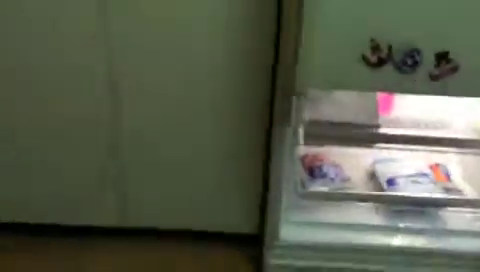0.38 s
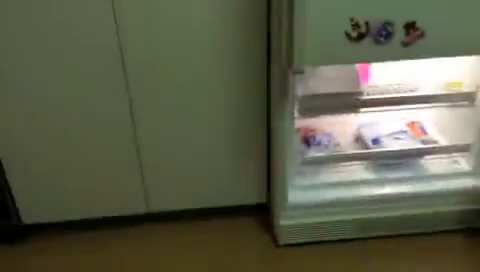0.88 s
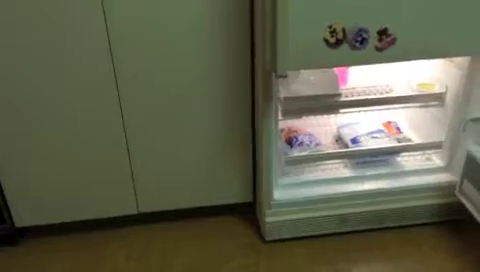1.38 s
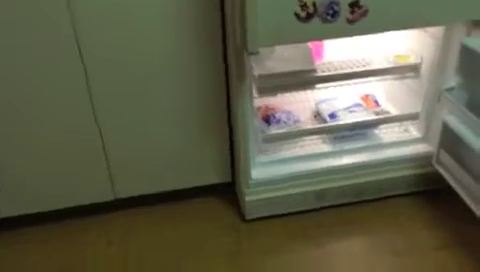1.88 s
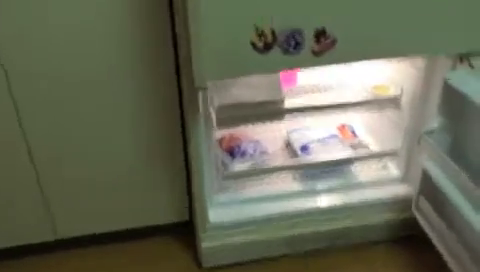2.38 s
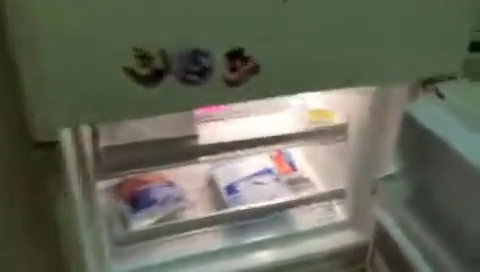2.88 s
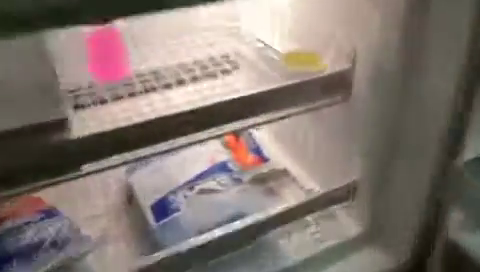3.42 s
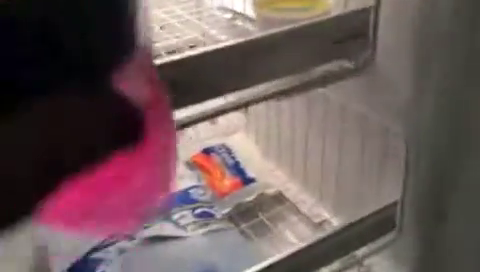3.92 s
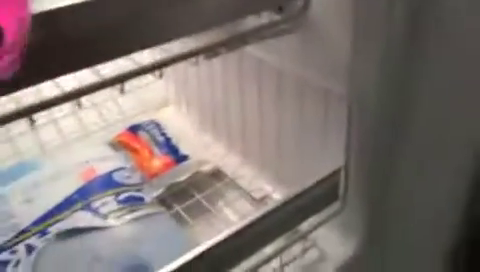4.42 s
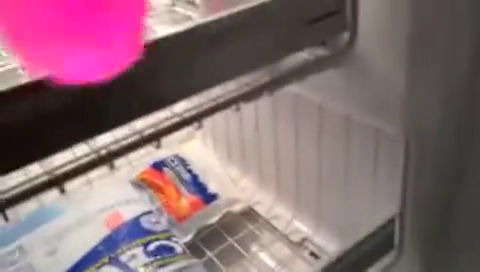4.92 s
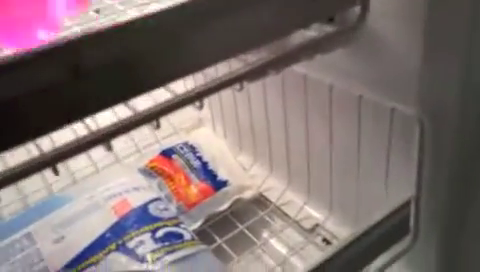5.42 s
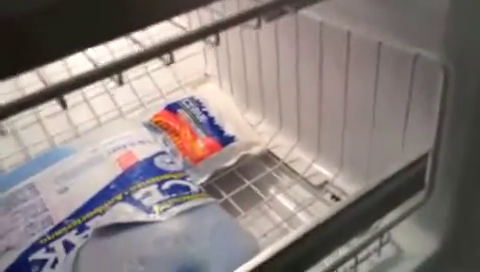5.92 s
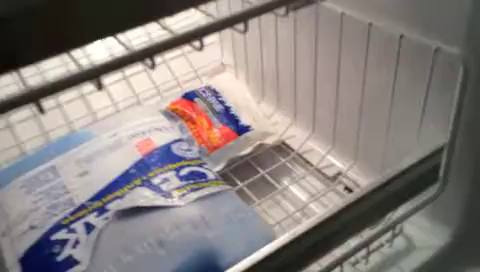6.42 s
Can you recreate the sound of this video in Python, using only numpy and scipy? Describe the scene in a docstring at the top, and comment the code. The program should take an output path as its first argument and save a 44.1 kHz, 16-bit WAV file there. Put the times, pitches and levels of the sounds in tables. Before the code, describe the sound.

Quiet footsteps and rustling, then light plastic bottles scrape, squeak and clack sharply onto wire baskets with dull thumps in a small kitchen.

```python
"""Bottles into a freezer

Someone steps up to an open freezer in a small kitchen and sets light plastic bottles down in its wire baskets.
Feet and the cabinet thump as damped low swings; bottles clack and rub as showers of tiny contacts that ring
their walls, drag over the wires through a gliding resonance and squeak by stick-slip.
Clothes and hands rustle as soft grains; handling rumble, a faint whistle and hiss are coloured noise."""
import sys
import numpy as np
from scipy import signal
from scipy.io import wavfile

SR = 44100
rng = np.random.default_rng(int(sys.argv[2]) if len(sys.argv) > 2 else 0)


def volts(x):
    """Linear amplitude factor 10**(x/20) for a level x in dB, scalar or array-like."""
    e = np.asarray(x, float) / 20
    return 10 ** e


def pcm_store(signal):
    """Save signal as 16-bit PCM."""
    levels = np.round(np.clip(np.atleast_2d(signal), -1, 1) * 32767)
    wavfile.write(sys.argv[1], SR, levels.astype(np.int16).T)


N = 288969
BANDS = 30 * 2 ** np.arange(0, 9.1, 1 / 3)   # edges of third-octave bands, Hz
UPPER_BANDS = list(zip(BANDS[9:], BANDS[10:]))   # those from 240 Hz up


def rms_one(x):
    """Normalisation: scale to rms 1."""
    return x / np.sqrt(np.mean(x ** 2) + 1e-20)


def in_time(rows):
    """Linear interpolation: columns of a curve, one value a sample."""
    s, *columns = np.transpose(rows)
    return [np.interp(np.arange(N) / SR, s, c) for c in columns]


def faded(rows, fade_s):
    """Onset and release: pitch and level of a sound that fades to -120 dB before and after its rows."""
    before = (rows[0][0] - fade_s, rows[0][1], -120)
    after = (rows[-1][0] + fade_s, rows[-1][1], -120)
    return in_time([before, *rows, after])


def at_hz(hz, points_hz, values):
    """Spectral envelope: values given at a few frequencies, read on a log axis."""
    share = [np.interp(np.log(hz), np.log(points_hz), row) for row in np.eye(len(points_hz))]
    return sum(w * v for w, v in zip(share, values))


def drift(rate_hz):
    """Slow random modulation: noise through a double pole, rms 1, computed at every 40th sample."""
    r = np.exp(-80 * np.pi * rate_hz / SR)
    white = rng.standard_normal(N // 40 + 2002)
    slow = signal.lfilter([1], [1, -2 * r, r * r], white)[2000:]
    return np.interp(np.arange(N) / 40, np.arange(len(slow)), rms_one(slow))


def bandpass(low_hz, high_hz):
    """Butterworth band-pass sections."""
    return signal.butter(2, [low_hz, high_hz], "band", fs=SR, output="sos")


def band(x, low_hz, high_hz):
    """Band-pass filtering of a signal."""
    return signal.sosfilt(bandpass(low_hz, min(high_hz, .45 * SR)), x + 1e-18)


def ring(x, hz, t60):
    """Damped resonance: a unit click sets a sine of height 1 ringing."""
    r, w = volts(-60 / (t60 * SR)), 2 * np.pi * hz / SR
    return signal.lfilter([0, np.sin(w)], [1, -2 * r * np.cos(w), r * r], x + 1e-18)


def gliding(x, hz, width_hz, size=256):
    """Time-varying resonance: its centre moves block by block, with gain 1 on top."""
    out, state, r = np.zeros(N), np.zeros(2), np.exp(-np.pi * width_hz / SR)
    b = np.array([1, 0, -1]) * (1 - r * r) / 2
    for i in range(0, N, size):
        a = [1, -2 * r * np.cos(2 * np.pi * hz[i] / SR), r * r]
        out[i:i + size], state = signal.lfilter(b, a, x[i:i + size], zi=state)
    return out


def grains(per_s, spread_db):
    """Shot noise: random tiny contacts of uneven size and either sign; rms 1."""
    sizes = volts(spread_db * np.minimum(rng.exponential(1, N), 4)) * rng.choice([-1, 1], N)
    return rms_one(sizes * (rng.random(N) < per_s / SR))


def steady(spectrum, patchy_db, patch_rate_hz):
    """Coloured noise: third-octave bands that waver on their own; rms 1."""
    hz, level_db = np.transpose(spectrum)
    white, out = rng.standard_normal((2, N)), np.zeros(N)
    for k, (low, high) in enumerate(zip(BANDS, BANDS[1:])):
        if low < hz[-1]:
            band_db = at_hz(np.sqrt(low * high), hz, level_db) + patchy_db * drift(patch_rate_hz)
            out += volts(band_db) * band(white[k % 2], low, high)
    return rms_one(out)


# Cloth, hands and sliding plastic. Each row: time in seconds, level in dB at 1.7 kHz before flutter,
# level at 8 kHz in dB relative to it.
RUSTLE = [(0, -63, -1), (.3, -65, -4), (.55, -61.5, -2.5), (.72, -62.5, -5), (.94, -57.5, -2.5),
          (1.4, -70.5, -7.5), (1.52, -62, -7), (1.83, -57, -8), (2.0, -66, -5), (2.25, -64.5, -5.5),
          (2.53, -57, -3), (2.72, -61.5, -5.5), (3.42, -61, 0), (3.5, -60.5, -2.5), (3.8, -51, 2.5),
          (3.95, -44, -1), (4.08, -32, -5), (4.14, -30.5, -8.5), (4.35, -53, -2), (4.53, -59, -3),
          (4.71, -50, -3), (5.05, -45.5, -1.5), (5.2, -51, -7.5), (5.4, -58.5, -0.5), (5.72, -47, -6.5),
          (6.05, -50, -4), (6.3, -57.5, 2), (6.55, -69.5, -7)]


def rustle(patchy_db=1.46, flutter_db=1.5, lumps=0.24, top_follows=1.2, press=0.54, thin=1.37):
    """Granular friction: dense soft grains and sparse dull knocks; hard rubbing loses bass and the very top."""
    level_db, high_db = in_time(RUSTLE)
    low_db = -3 - 0.28 * high_db - thin * np.maximum(level_db + 44.5, 0)   # 550 Hz relative to 1.7 kHz
    top_db = top_follows * high_db - press * np.maximum(level_db + 62.5, 0)   # 15 kHz likewise
    soft, knocks = [grains(12000, 2.3), grains(12000, 2.0)], grains(600, 3.6)
    out = np.zeros(N)
    for k, (low, high) in enumerate(UPPER_BANDS):
        colour_db = at_hz(np.sqrt(low * high), [550, 1700, 8000, 15000], [low_db, 0, high_db, top_db])
        source = soft[k % 2] + lumps * knocks * (high < 1500)
        equal_power = np.sqrt(2000 / (high - low))   # undoes the width of the band
        out += volts(colour_db + patchy_db * drift(12)) * band(source, low, high) * equal_power
    return out * volts(level_db + flutter_db * drift(15))   # all bands flutter together


# Colour of the rumble before scaling to rms 1. Each row: frequency in Hz, level in dB.
RUMBLE = [(15, -50), (25, -19.5), (54, -10), (70, 6.5), (130, -5), (188, 3), (292, -18), (400, -9),
          (520, -71), (880, -120)]
# Strength of the handling. Each row: time in seconds, rumble level in dB.
HANDLING = [(0, -51.5), (.25, -66), (.9, -60.5), (1.2, -70.5), (1.42, -76), (1.55, -59.5), (1.83, -57),
            (2.0, -74), (2.35, -63.5), (2.5, -59), (2.85, -65), (3.1, -59), (3.4, -61), (3.62, -48),
            (3.8, -58), (4.1, -54), (4.3, -45.5), (4.5, -44.5), (4.71, -27), (4.89, -41), (5.14, -36),
            (5.4, -46.5), (5.8, -39.5), (6.0, -39), (6.2, -36), (6.55, -47.5)]


def rumble(shudder_db=-15, shudder_t60_s=0.31):
    """Amplitude-modulated low noise: lumpy rumble from handling, and from the cabinet shuddering after thumps."""
    level_db, = in_time(HANDLING)
    kicks = np.zeros(N)
    for s, db, *_ in THUMPS:
        kicks[round(s * SR)] = volts(db + shudder_db)
    shudder = signal.lfilter([1], [1, -volts(-60 / (shudder_t60_s * SR))], kicks)
    shudder = signal.lfilter(np.hanning(SR // 50) / (SR // 100), [1], shudder)   # it builds up over 20 ms
    return (volts(level_db) + shudder) * steady(RUMBLE, patchy_db=4.0, patch_rate_hz=28.0)


# Colour of the hiss before scaling to rms 1. Each row: frequency in Hz, level in dB.
HISS = [(18, -34), (30, 10.5), (85, 11), (177, 8.5), (606, -5), (656, -3.5), (1820, -20), (2360, -31),
        (6890, -13.5), (14300, -24), (15500, -33)]


def room_hiss(level_db=-63.5):
    """Stationary coloured noise: the faint hiss of the room, slightly patchy."""
    return volts(level_db) * steady(HISS, patchy_db=3.5, patch_rate_hz=4.3)


# Frequencies in Hz at which the colour of a contact is set.
COLOUR_HZ = [250, 550, 1200, 2400, 5000, 11000]


def colour(rows, hz, small_db=-8, lean=0.19, dull_db=-0.5, dull_follows=-0.12):
    """Radiation efficiency: a small object radiates little bass; a dull contact gains near 1.2 kHz."""
    _, level_db, low_db, high_db = rows[:, :4].T
    middle_db = lean * low_db + dull_db + dull_follows * high_db
    presence_db = 4 + 0.62 * high_db   # 5 kHz follows part of the 11 kHz level
    return level_db + at_hz(hz, COLOUR_HZ, [low_db + small_db, low_db, middle_db, 0, presence_db, high_db])


# Plastic on wire. Each row: start in seconds, level in dB at 2.4 kHz before scatter and path gains,
# levels at 550 Hz and at 11 kHz in dB relative to it, rattle t60 in seconds at 1.7 kHz (held to 0.01-0.5).
CLACKS = [(0.46, -49, 3.5, -54, 0.3), (0.786, -51, 0, 0.5, 0.24), (0.8066, -50, 9, -44, 0.21),
          (0.9328, -56, 24.5, -44, 0.1), (1.4642, -31, -15, -20, 0.16), (1.559, -46, -15, -15, 0.05),
          (1.6204, -64, -15, 10.5, .09), (1.6655, -46.5, 4, -75, 0.064), (1.9574, -61.5, -14, 7, 0.4),
          (2.5251, -33, -6.5, 4.5, 0.22), (2.8867, -42.5, 5.5, -10, 0.23), (3.012, -58, 12, -30, 0.13),
          (3.204, -46.5, -7.5, -15, 0.1), (3.2685, -43, -33, -8.5, 0.043), (3.453, -32, -3.5, -11, 0.17),
          (3.4986, -24.5, -51, -2.5, 0.19), (3.6142, -44, -4, -31, 0.068), (3.7873, -41.5, -1, -12, .05),
          (3.898, -36.5, -15, -4, 0.15), (3.9282, -26.5, 0.5, -74, 0.014), (4.1194, -21, -14.5, -16, 0.066),
          (4.1345, -29, -3, -12, 0.095), (4.1827, -17.5, -9, -9, 0.088), (4.248, -24, -14, -48, .031),
          (4.467, -36.5, -34, -31, 0.085), (4.506, -54, 3, 15.5, 0.081), (4.5382, -26.5, 7.5, -17, 0.23),
          (4.5473, -8.5, -12, -20, 0.028), (4.556, 2.9, -23, -12, 0.041), (4.7024, -30, 5.5, -10, 0.088),
          (4.7725, -21, -3, -4, 0.053), (5.1899, -36.5, 8.5, -11.5, 0.21), (5.218, -1, -11.5, -10.5, 0.09),
          (5.2387, -16.5, 5, -19, 0.098), (5.2627, -10.5, -7.5, -46.5, 0.036), (5.3912, -38.5, 5, -70, .04),
          (5.478, -39, 13, -6, 0.36), (5.5168, -34.5, -8, -53, .12), (5.5664, -2.5, -14, -9.5, 0.081),
          (5.7864, -48, 12.5, -3, 0.11), (5.8396, -41.5, -8.5, -1, 0.11), (5.903, -37, 12.5, -60, 0.056),
          (5.9708, -25, -44.5, -6.5, 0.062), (6.0207, -1, -41.5, -2.5, 0.045),
          (6.183, -49.5, 2.5, -48.5, 0.057), (6.2278, -52, 17, -15, 0.2), (6.3125, -49.5, 10, 0.5, 0.15),
          (6.5008, -62, 1, 10, .041)]
# Short rubs that swell and fade. Each row: time of the peak in seconds, level in dB at 2.4 kHz before scaling
# by path gains, levels at 550 Hz and at 11 kHz in dB relative to it, time from peak to silence in seconds
# (held to 0.01-0.12).
RUBS = [(0.03, -51.5, -5, -12, .087), (0.51, -56.5, -9, -3, .056), (0.772, -51, -7, -11, .03),
        (0.973, -63, 7, 9.5, .066), (1.18, -60, -1, -11, .057), (1.687, -50, -5, -10.5, .062),
        (1.936, -53.5, -19, -8, .069), (2.207, -56, -11, -4, .11), (2.455, -58, 11.5, -14, .042),
        (4.268, -35.5, 4.5, -8, .046), (4.351, -44, 0.5, -30, .053), (4.633, -43.5, 10, -42, .075),
        (4.7, -38.5, 14, -50, .04), (4.805, -32.5, 1, -8, .04), (4.993, -53, -7, -3, .035),
        (5.08, -28, 3.8, -9, .033), (5.153, -53.5, 27.5, -17.5, .04), (5.244, -18, -7, -6.5, .034),
        (5.317, -39, 3, -41, .024), (5.489, -36.5, -17.5, -28, .032), (5.541, -37.5, 4, -13, .05),
        (5.648, -48, 3, -34, .072), (5.791, -36.5, 8.5, -8.5, .039), (5.853, -42, 12, -13, .038),
        (6.2, -45, 15.5, -33.5, .036), (6.356, -50, -10.5, -9, .033), (6.432, -54, 7.5, -35.5, .036)]
# A thin plastic wall rings briefly. Each row: frequency in Hz, level in dB relative to the common mode gain,
# t60 in seconds (held to 0.004-0.03).
BOTTLE = [(442, -1.5, 0.042), (593, -14.5, 0.057), (647, -3, 0.046), (924, -7.5, 0.048), (1015, -2, 0.051),
          (1150, -27, 0.0053), (1340, -12, 0.0056), (1658, -4, 0.022), (1820, -26.5, 0.017),
          (2260, -33.5, 0.014), (2664, -19.5, 0.045), (3250, -29, 0.0025), (3814, -24.5, 0.031)]


def contact_force(hz, shower, scatter_db, rub_db, treble_dies=0.17, first_db=12):
    """Impact and friction excitation: blows are dying showers after one hard click, rubs are swelling ones."""
    hits, rubs, age = np.array(CLACKS), np.array(RUBS), np.arange(SR // 4) / SR
    envelope, first = np.zeros(N + len(age)), np.zeros(N)
    hit_db = colour(hits, hz) + scatter_db * rng.standard_normal(len(hits))   # each blow lands on another spot
    t60 = np.clip(hits[:, 4], .01, .5) * (1700 / hz) ** treble_dies
    for s, db, t in zip(hits[:, 0], hit_db, t60):
        envelope[round(s * SR):][:len(age)] += volts(db - 60 * age / t)
        first[round(s * SR)] -= volts(db + first_db)
    for s, db, length in zip(rubs[:, 0], colour(rubs, hz), np.clip(rubs[:, 4], .01, .12)):
        span = np.arange(max(round((s - length) * SR), 0), round((s + length) * SR))
        swell = np.cos(np.pi / 2 * (span / SR - s) / length) ** 2
        envelope[span] += volts(db + rub_db) * swell
    return envelope[:N] * shower + first


def contacts(direct_db=-3, modes_db=-24, direct_scatter_db=1.0, mode_scatter_db=2.0, rub_rings_db=-6):
    """Modal synthesis: wire-on-plastic contacts are heard directly and through the bottle's modes."""
    showers = [grains(7000, 5.33) for _ in range(2)]
    out = np.zeros(N)
    for k, (low, high) in enumerate(UPPER_BANDS):
        force = contact_force(np.sqrt(low * high), showers[k % 2], direct_scatter_db, 0)
        equal_power = np.sqrt(2000 / (high - low))   # undoes the width of the band
        out += volts(direct_db) * band(force, low, high) * equal_power
    for hz, level_db, t60 in BOTTLE:
        force = contact_force(hz, showers[0], mode_scatter_db, rub_rings_db)
        out += volts(level_db + modes_db) * ring(force, hz, np.clip(t60, .004, .03))
    return out


# Feet on the floor, weight on the baskets. Each row: start in seconds, peak of the tone in dB before
# a slight waver, starting pitch in Hz, time to the widest swing in seconds (held to 0.003-0.06).
THUMPS = [(0.038, -53, 145, 0.031), (0.457, -32, 173.5, 0.01), (0.496, -37.5, 168, 0.012),
          (0.801, -33, 140.4, 0.0081), (0.835, -33, 145, 0.0054), (.932, -39, 196, .0037),
          (0.96, -31.5, 92, 0.0045), (2.444, -38.5, 90, 0.0031), (2.888, -20, 171, .012),
          (3.01, -49, 132, .0081), (3.074, -36.5, 75, 0.0061), (3.449, -14.5, 162.3, 0.01),
          (3.486, -15.5, 107, .007), (3.883, -39.5, 96, 0.018), (4.129, -10.5, 71.6, .01),
          (4.167, -15, 69, 0.0064), (4.225, -24, 74, 0.0068), (4.261, -22.5, 71.5, 0.011),
          (4.546, -28, 180, 0.018), (4.601, -20, 91, 0.0078), (4.695, -25.5, 190, 0.016),
          (4.769, -17.5, 65, 0.016), (5.106, -21.5, 65.6, 0.013), (5.234, -14, 60, 0.014),
          (5.263, -13.5, 75, 0.011), (5.368, -21.5, 78, 0.0099), (5.561, -13.5, 79, 0.012),
          (5.579, -5.5, 76, 0.0097), (5.608, -12, 76.4, 0.01), (5.677, -31, 70.4, 0.029),
          (5.788, -26.5, 70.7, 0.037), (6.021, -32, 86.5, 0.019), (6.024, -22.5, 408, 0.0074),
          (6.178, -34, 137.4, 0.027)]


def thumps(sag=.03, body_db=-14, weight_db=-17):
    """Damped panel vibration: a soft blow slowly swings a heavy panel; weak modes blur it, the floor yields."""
    out, age = np.zeros(N + SR // 2), np.arange(SR // 2) / SR
    white = rng.standard_normal((2, N + SR // 2))
    small = rms_one(signal.sosfilt(bandpass(180, 330), white[0]))
    large = rms_one(signal.sosfilt(bandpass(100, 182), white[0]))
    floor = rms_one(signal.sosfilt(bandpass(35, 90), white[1]))
    for s, db, hz, swell in THUMPS:
        u = age / np.clip(swell, .003, .06)
        span = slice(round(s * SR), round(s * SR) + len(age))
        cycles = hz * age * (1 - sag * np.minimum(u, 4) / 4)   # the pitch sags
        if hz > 120:
            blur = volts(body_db) * small[span] + volts(weight_db) * floor[span]
        else:
            blur = volts(body_db) * large[span]
        swing = u * np.exp(1 - u)   # reaches 1 at the widest swing
        out[span] -= volts(db) * (np.sin(2 * np.pi * cycles) + blur) * swing
    return out[:N] * volts(1.5 * drift(30))


# A faint high whistle in the rustle. Each row: time in seconds, pitch in Hz, level in dB.
WHISTLE = [(2.28, 3640, -84), (2.36, 3440, -68), (2.65, 3400, -82), (2.7, 3350, -88)]


def whistle(width_hz=220):
    """Narrow-band filtering: noise passes twice through a narrow gliding resonance."""
    hz, level_db = faded(WHISTLE, .02)
    once = gliding(rng.standard_normal(N), hz, width_hz)
    return rms_one(gliding(once, hz, width_hz)) * volts(level_db)


# A bottle dragged over the wires. Each row: time in seconds, hollow resonance in Hz, level in dB before jerks.
DRAG = [(3.72, 1180, -56.5), (3.79, 1150, -50.5), (3.91, 1236, -37), (3.96, 1150, -42), (4.02, 1150, -32.5),
        (4.1, 1260, -37)]
# Resonances of the dragged bottle. Each row: multiple of the hollow resonance, width in Hz, relative level in dB.
DRAG_MODES = [(.8, 110, -6), (1.0, 100, 0), (1.38, 130, -3), (1.6, 140, -2)]


def drag(jerk_db=2.5):
    """Friction-driven resonance: uneven scraping rings the hollow bottle and its walls; it moves in jerks."""
    hz, level_db = faded(DRAG, 0.018)
    scrape = grains(2400, 4.0) * volts(2.2 * drift(60))
    out = np.zeros(N)
    for k, (multiple, width_hz, db) in enumerate(DRAG_MODES):
        out += (-1) ** k * volts(db) * gliding(scrape, multiple * hz, width_hz)
    return rms_one(out) * volts(level_db + jerk_db * drift(25))


# Plastic sticking and slipping on a wire, one list a squeak. Each row: time in seconds, mean slips per second,
# level in dB before flutter and the partials' own levels.
SQUEAKS = [
    [(4.113, 1580, -28), (4.128, 1720, -28)],
    [(4.136, 2060, -28), (4.15, 2200, -26), (4.165, 2270, -24), (4.186, 2200, -26)],
    [(4.208, 2110, -27), (4.222, 2060, -24), (4.24, 2060, -29)],
    [(4.25, 2100, -38), (4.258, 2140, -37), (4.272, 2120, -42)],
]
# Levels of partials 1 to 4 in dB, relative to the level of the squeak.
SQUEAK_PARTIALS_DB = [-3.2, -13.5, -21, -36]


def squeaks(flutter_db=3.5):
    """Stick-slip oscillation: slips at a fast, slightly unsteady rate give a tone with overtones."""
    out = np.zeros(N)
    for rows in SQUEAKS:
        hz, level_db = faded(rows, .012)
        phase = 2 * np.pi * np.cumsum(hz * (1 + .011 * drift(400))) / SR
        for k, db in enumerate(SQUEAK_PARTIALS_DB):
            flutter = flutter_db * np.sqrt(k + 1) * drift(150)   # higher partials flutter more
            out += np.sqrt(2) * volts(level_db + db + flutter) * np.sin((k + 1) * phase)
    return out


def kitchen(x, level_db=-16.5, dull_t60_s=0.26, bright_t60_s=0.16, split_hz=1860):
    """Diffuse reverberation: dense echoes die away, the dull ones later than the bright ones."""
    age = np.arange(SR // 2) / SR
    echoes = rng.standard_normal((2, len(age))) * np.minimum(age / 0.0012, 1)
    dull = band(echoes[0], 120, split_hz) * volts(-60 * age / dull_t60_s)
    bright = band(echoes[1], split_hz, 15000) * volts(-60 * age / bright_t60_s)
    response = (dull + bright) / np.linalg.norm(dull + bright)
    return volts(level_db) * signal.fftconvolve(x, response)[:N]


def scene():
    """Superposition: all sources, the echoes of the near ones and the hiss."""
    near = contacts() + thumps() + drag() + squeaks()
    return (near + kitchen(near) + rustle() + rumble() + whistle() + room_hiss())[None]


def roll_off(x):
    """The treble ends steeply here."""
    return signal.sosfilt(signal.butter(12, 16450, fs=SR, output="sos"), x)


def record(dry):
    """Band-limiting and overload: the top is cut from 15.9 kHz, then peaks beyond full scale are clipped."""
    cut = signal.sosfilt(signal.cheby2(12, 45, 15900, fs=SR, output="sos"), dry)
    mix = np.clip(cut, -1, 1)
    return roll_off(mix)


dry = scene()
out = record(dry)
pcm_store(out)
```